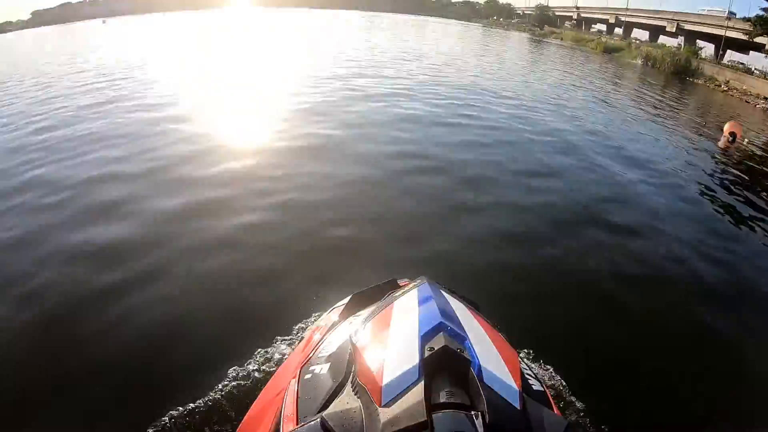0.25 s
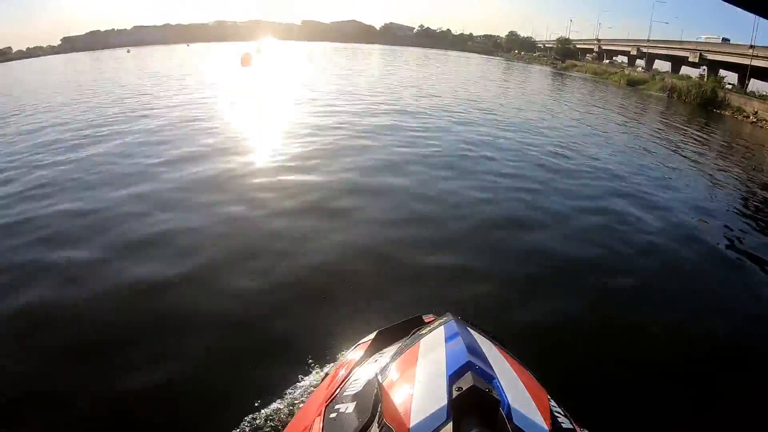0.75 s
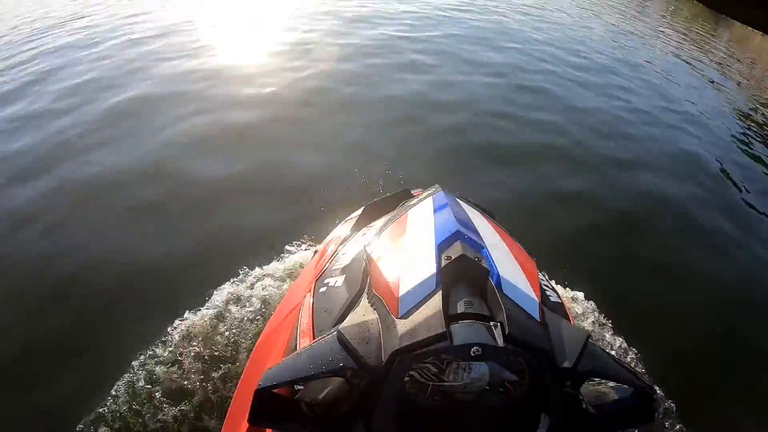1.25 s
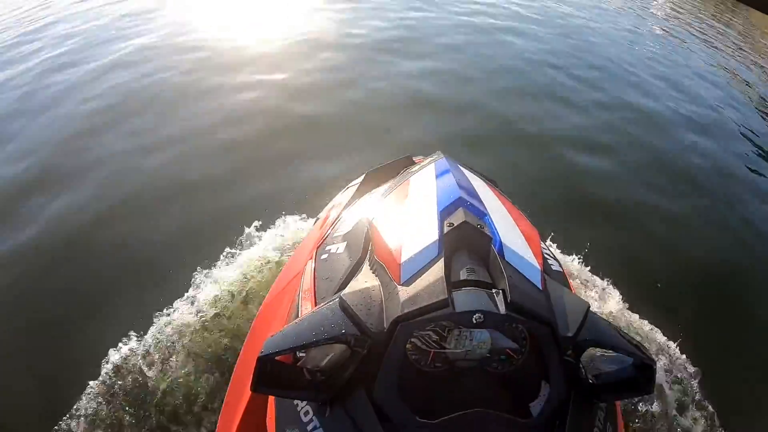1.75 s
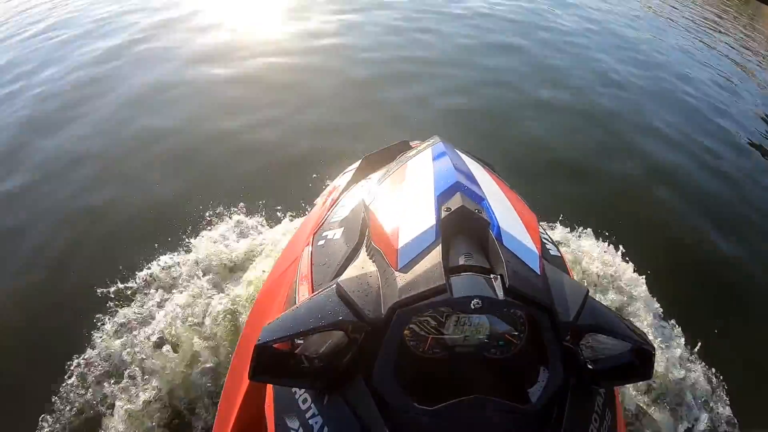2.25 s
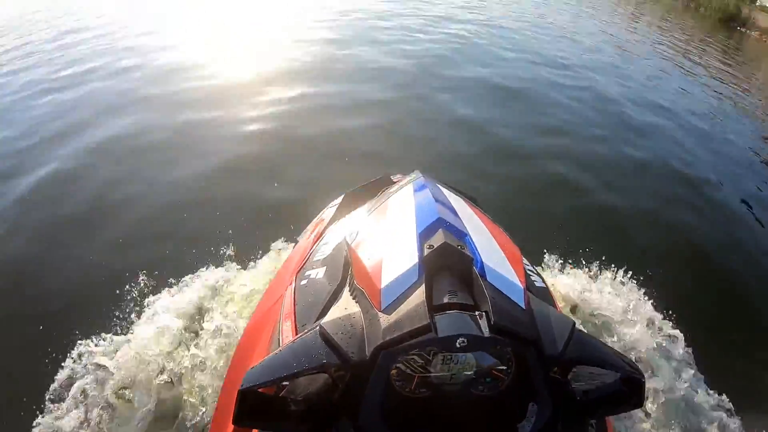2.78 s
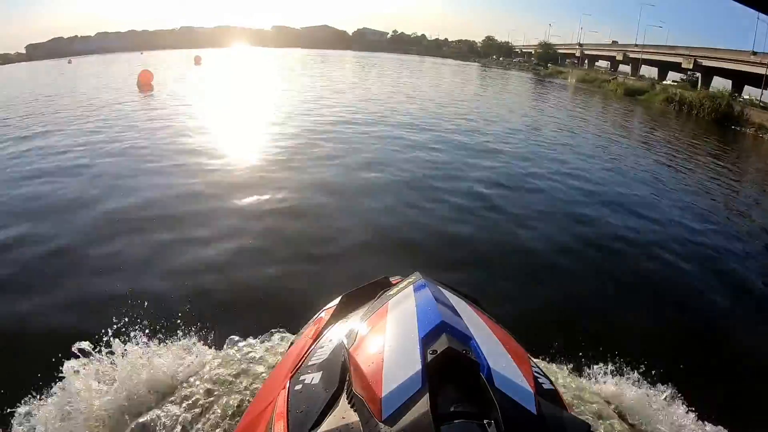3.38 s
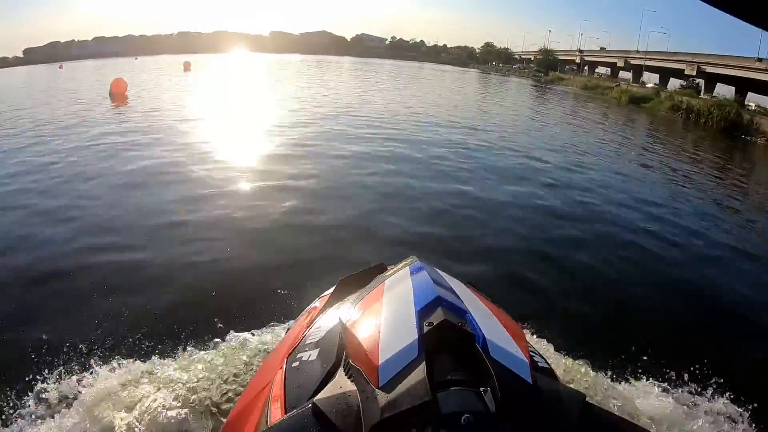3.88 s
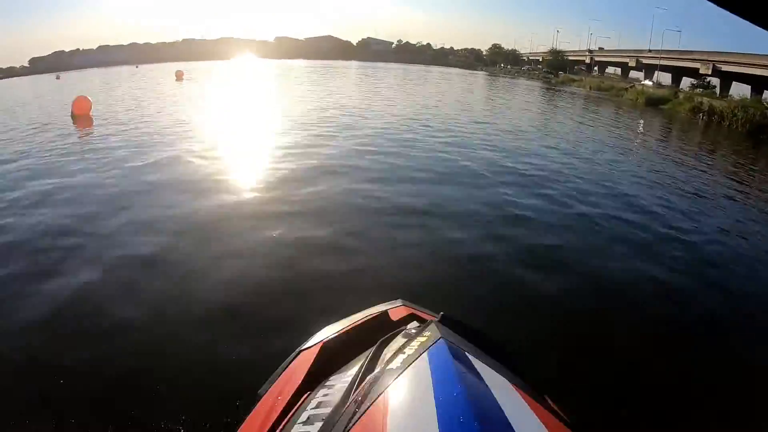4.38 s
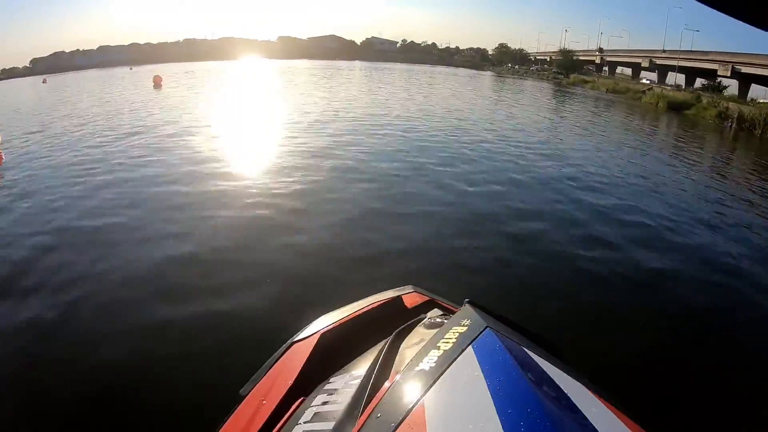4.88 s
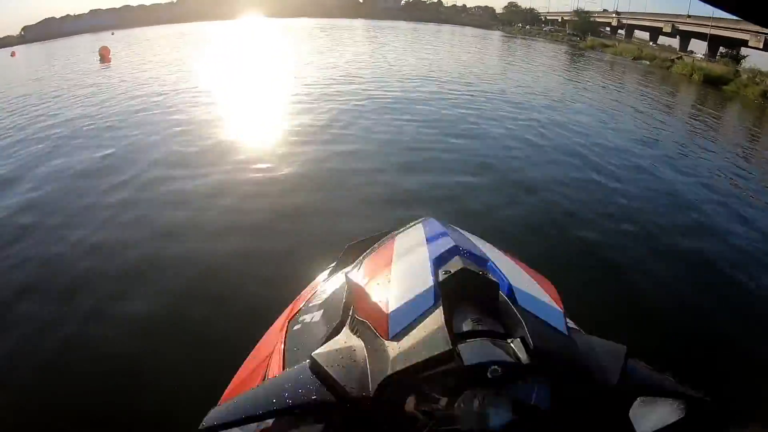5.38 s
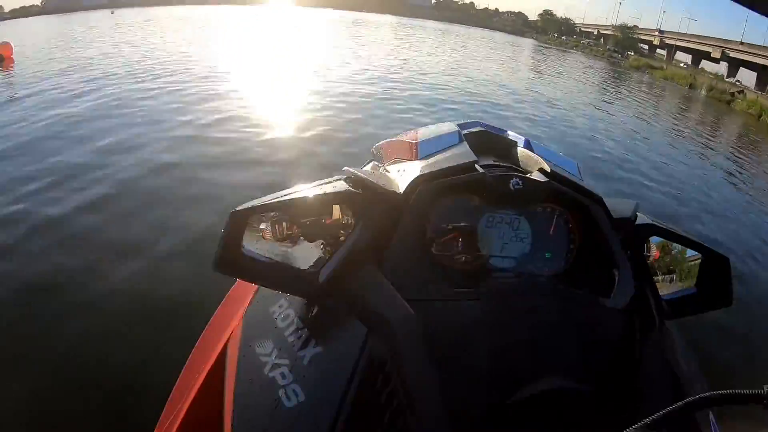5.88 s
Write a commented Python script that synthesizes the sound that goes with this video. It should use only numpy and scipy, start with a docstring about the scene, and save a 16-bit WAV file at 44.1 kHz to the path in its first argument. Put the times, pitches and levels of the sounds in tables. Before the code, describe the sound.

Rider's view of a jet-driven watercraft, heard by a housed microphone on the rider in the open, without echo. A slow, buzzy engine burble over gurgling wash comes first, with splashing gradually swelling. Then a fast rev-up turns the burble into a loud steady roar; bow spray thins out while rushing water and buffeting low wind grow, and a dull knock lands near the end.

```python
"""A three-cylinder jet-drive watercraft pushes slowly across a lake: a housed microphone on the rider
hears firing harmonics through the hull (sines locked to the engine cycle), churned water (shaped noise),
faint ticks and a thin blower whistle. Bow spray (noise and drop impacts) then grows. Past four seconds
the throttle opens and the craft climbs onto the plane: the engine tones leap up, a water sheet hisses,
low noise of wind thumps on the housing, and a louder knock comes near the end."""
import sys
import numpy as np
from scipy import signal
from scipy.fft import rfft, irfft, next_fast_len
from scipy.io import wavfile
from scipy.ndimage import uniform_filter1d, minimum_filter1d

SR = 44100
rng = np.random.default_rng(int(sys.argv[2]) if len(sys.argv) > 2 else 0)


def linear_from_db(decibels):
    """Turn decibels (scalar or array-like) into linear amplitude factors; 0 gives 1."""
    return 10 ** (np.asarray(decibels, float) / 20)


def wav_record(signal):
    """Record a signal, one row per channel, as 16-bit PCM in the file named by sys.argv[1]."""
    frames = np.transpose(np.atleast_2d(signal))
    bounded = np.clip(frames, -1, 1)
    # unit amplitude maps onto the largest positive 16-bit level
    quanta = np.round(bounded * 32767).astype(np.int16)
    wavfile.write(sys.argv[1], SR, quanta)


N = 270774
FULL_PER_S = 70  # engine cycles per s at full throttle


def rms_one(x):
    """Scale to rms 1."""
    return x / np.sqrt(np.mean(x ** 2) + 1e-20)


def in_time(rows):
    """Interpolate every column of a table to one value per sample."""
    s, *columns = np.transpose(rows)
    return [np.interp(np.arange(N) / SR, s, column) for column in columns]


def drift(rate_hz):
    """Slow chance of rms 1: noise through a double one-pole low-pass, at one value per 40 samples."""
    pole = np.exp(-2 * np.pi * rate_hz * 40 / SR)
    noise = rng.standard_normal(N // 40 + 2002)
    slow = signal.lfilter([1], [1, -2 * pole, pole * pole], noise)[2000:]
    return np.interp(np.arange(N) / 40, np.arange(len(slow)), rms_one(slow))


def bump(at_s, length_s):
    """A smooth rise and fall to 1 and back, above half height for the given length."""
    return 2.0 ** -(2 * (np.arange(N) / SR - at_s) / length_s) ** 2


def coloured(source, spectrum):
    """Shape a source by a spectrum, interpolated over log frequency; rms 1."""
    hz, db = np.transpose(spectrum)
    size = next_fast_len(N)
    bins_hz = np.maximum(np.arange(size // 2 + 1) * SR / size, 1)
    gain = linear_from_db(np.interp(np.log(bins_hz), np.log(hz), db))
    return rms_one(irfft(rfft(source, size) * gain, size)[:N])


def grains(per_s, spread_db):
    """Droplet impacts at random moments, their sizes spread exponentially in dB; rms 1."""
    sizes = linear_from_db(spread_db * np.minimum(rng.exponential(1, N), 5))
    signs = rng.choice([-1, 1], N)
    return rms_one(sizes * signs * (rng.random(N) < per_s / SR))


def tone_db(multiple, per_s):
    """Hull and exhaust favour some pitches: weigh one multiple of the cycle as it glides, with its swells."""
    # Each row: frequency in Hz, level in dB.
    hull = [(20, -44), (55, -33), (72, -23), (82, -20.5), (100, -15), (130, -14.5), (150, -16), (175, -16),
            (210, -19.5), (228, -22.5), (245, -18), (262, -6.5), (290, -14.5), (315, -15.5), (345, -15),
            (420, -15.5), (640, -23), (900, -16.5), (1700, -22)]
    # Single tones swell or fade. Each row: centre in s, length in s, multiple of the cycle, change in dB.
    swells = [(.03, 0.1, 3, -10), (0.16, .1, 3, 8.5), (0.911, 0.6, 3, -4), (4.26, 0.065, 3, -4.5),
              (4.404, 0.095, 3, 6), (4.509, .04, 3, -16), (4.57, 0.13, 3, 7), (4.977, 0.2, 3, -21),
              (5.22, 0.087, 3, 7.5), (5.414, 0.12, 3, 5.5), (5.66, 0.21, 3, -8.5), (5.81, 0.092, 3, 4),
              (6.113, 0.081, 3, -19.5), (0.17, 0.11, 6, -8), (1.163, 0.15, 6, 7.5), (1.85, 0.14, 6, -9.5),
              (2.6, 0.75, 6, -4.5), (3.49, 0.36, 6, -17), (4.113, .06, 6, -8), (4.69, 0.11, 6, 8.5),
              (5.17, 0.14, 6, 5.5), (4.298, 0.033, 6, 6), (.55, .08, 6, 1.5), (0.76, 0.057, 6, -6),
              (5.418, .1, 6, -15.5), (5.893, 0.22, 6, 2), (0.38, 0.24, 9, 6), (0.99, 0.62, 9, -18.5),
              (2.67, 0.12, 9, -6), (.8, .7, 11, -8), (0.22, 0.11, 21, 8.5), (.22, .1, 24, 11),
              (5.2, .6, 14, -6), (3.723, 0.22, 9, 4), (4.075, 0.08, 9, 4.5), (4.156, 0.086, 9, -5),
              (5.04, 0.17, 9, 6), (5.4, .15, 9, -4), (1.193, .15, 12, -8), (1.79, 0.15, 12, -9),
              (2.847, 0.41, 12, 5.5), (4.342, 0.09, 12, 12.5), (4.675, 0.13, 12, -13.5), (5.0, .1, 12, 6.5),
              (5.87, 0.2, 12, -7), (6.2, .35, 12, 4.5), (5.75, 0.7, 11, -11), (0.503, 0.55, 4, 11),
              (1.598, 0.87, 4, 6), (1.605, 0.68, 5, 4), (0.03, 0.1, 12, -14), (.27, 0.077, 12, 13.5),
              (.15, 0.091, 12, -8), (.45, 0.23, 12, 4.5), (4.31, .1, 13, 10), (.11, .09, 15, 14),
              (.17, 0.034, 15, -14), (0.2, .05, 15, 7), (0.25, .05, 15, -10), (4.45, 0.27, 4, 9.5),
              (5.8, .45, 4, 7), (1.2, .6, 5, -8), (3.4, .8, 5, -6), (3.8, .5, 7, 7.5), (5.8, .6, 8, 6.5),
              (2.2, 1.0, 11, 7.5), (2.9, 0.78, 16, 4), (2.1, .8, 15, 4.5), (5.44, 0.092, 18, 6),
              (5.95, 0.54, 18, -8), (5.9, .5, 16, -6), (3.3, 0.8, 24, 10.5), (0.57, 1.0, 15, 12),
              (1.548, .5, 24, 16)]
    hz, db = np.transpose(hull)
    swell_db = sum(change_db * bump(s, length_s) for s, length_s, k, change_db in swells
                   if round(k) == multiple)
    return np.interp(np.log(multiple * per_s), np.log(hz), db) + swell_db


def engine(turns, per_s):
    """Sines locked to the cycle add up to exhaust pulses; combustion varies, so each wavers, more at speed."""
    # Firing tone (3rd multiple of the cycle) and its harmonics: level in dB before hull colour.
    firing = (-0.5, -8, -11.5, -19)
    # Cylinders differ, so other multiples sound too. Each row: multiple of the cycle,
    # level in dB before hull colour when slow, the same at full throttle.
    uneven = [(1, -12, -11.5), (2, -0.5, -11), (4, -18, -26), (5, -17, -27.5), (7, -28, -17), (8, -19, -17),
              (10, -27.5, -18), (11, -28.5, -13), (13, -32, -25.5), (14, -35.5, -25.5), (15, -27, -26.5),
              (16, -27.5, -21.5), (17, -29.5, -24), (18, -27.5, -20.5), (20, -25.5, -34.5),
              (21, -27.5, -40), (24, -31.5, -27)]
    out = np.zeros(N)
    strain = per_s / FULL_PER_S
    for k, level_db in enumerate(firing, 1):
        phase = 3 * k * turns + 0.18 * drift(9) + 0.12 * k * strain ** 2 * drift(25)
        level_db = level_db + tone_db(3 * k, per_s) + 1.2 * drift(14)
        out += linear_from_db(level_db) * np.sin(phase)
    opened = np.clip(2 * strain - 1, 0, 1)
    for multiple, slow_db, full_db in uneven:
        k = round(multiple)
        level_db = slow_db + opened * (full_db - slow_db) + tone_db(k, per_s)
        level_db += 1.8 * drift(5) + 1.4 * strain * drift(20)
        waver = 0.07 + (0.12 + 0.022 * multiple) * strain ** 2
        phase = k * turns + rng.uniform(0, 2 * np.pi) + 0.8 * drift(1.5) + waver * drift(20)
        out += linear_from_db(level_db) * np.sin(phase)
    return np.sqrt(2) * out


def wind(wash_db):
    """Eddies shed at the housing: low noise that grows with the wash; the strongest lumps saturate."""
    # Gusts and lulls. Each row: centre in s, length in s, change in dB.
    gusts = [(0.023, 0.56, 12), (2.0, 0.49, 4), (3.494, 0.49, 3), (5.0, 0.37, -6.5), (5.3, 0.23, 1.5),
             (5.65, 0.045, 3), (5.718, 0.046, 15), (5.847, 0.11, 8), (6.066, 0.11, 3)]
    # Eddy spectrum. Each row: frequency in Hz, relative level in dB per Hz.
    eddy_spectrum = [(15, -24.5), (30, -7), (60, 23.5), (120, 15), (200, 11.5), (280, 4), (350, -4),
                     (600, -29), (2000, -100)]
    level_db = -44.5 + 1.69 * wash_db
    level_db += sum(db * bump(s, length_s) for s, length_s, db in gusts)
    eddies = coloured(rng.standard_normal(N), eddy_spectrum)
    strength = uniform_filter1d(uniform_filter1d(eddies ** 2, size=900), size=900)
    return linear_from_db(level_db) * rms_one(eddies / (strength + 0.3) ** 0.3)


def churn(level_db, turns):
    """Exhaust and jet beat through the water: low noise that each firing and each cycle pushes a little."""
    # Each row: frequency in Hz, relative level in dB per Hz.
    churn_spectrum = [(60, -7.5), (120, 2), (250, -3), (400, -7.5), (600, -8.5), (800, -15), (1150, -17.5),
                      (1600, -23.5), (2000, -27), (2250, -37.5), (6000, -100)]
    throb = 1 + 0.11 * np.cos(3 * turns) + 0.11 * np.cos(turns)
    noise = coloured(rng.standard_normal(N) * throb, churn_spectrum)
    return linear_from_db(level_db + 0.35 * drift(4.9)) * noise


def rush(level_db, per_s):
    """Water breaks along the hull: noise and drop impacts, louder and deeper once the craft planes."""
    # Spectra when slow and on the plane. Each row: frequency in Hz, relative level in dB per Hz.
    slow_spectrum = [(900, -12), (2000, 5), (3000, 1.5), (4800, -2.5), (6300, -13), (7500, -22.5),
                     (8500, -24.5), (9800, -42), (12000, -69.5)]
    planing_spectrum = [(600, -5.5), (1300, -3.5), (2000, -2.5), (2600, -4.5), (3500, -10), (5100, -17.5),
                        (6500, -28.5), (8500, -38.5), (9800, -52.5), (12000, -90)]
    source = rng.standard_normal(N) + 0.4 * grains(1500, spread_db=4.0)
    planing = np.clip((per_s - 35) / 30, 0, 1)
    wash = (1 - planing) * coloured(source, slow_spectrum)
    wash += planing * linear_from_db(7.5) * coloured(source, planing_spectrum)
    return linear_from_db(level_db + 0.65 * drift(23)) * wash


def spray(level_db):
    """The bow wave falls back as drops, in clumps: noise plus impacts at a drifting rate."""
    # Each row: frequency in Hz, relative level in dB per Hz.
    spray_spectrum = [(3000, -2.5), (5000, 8), (6500, 1.5), (8000, 1), (9500, -5), (11200, -17),
                      (12200, -1), (13500, -3.5), (15500, -11)]
    drops = grains(2500 * linear_from_db(4.1 * drift(25)), spread_db=0.0)
    source = rng.standard_normal(N) + drops
    return linear_from_db(level_db + 1.3 * drift(6)) * coloured(source, spray_spectrum)


def ticks():
    """Something small ticks against the hull: band-passed bursts of noise that die exponentially."""
    # Each row: start in s, level in dB before the band-pass, 60 dB decay time in s, lowest frequency in Hz.
    tick_rows = [(.174, -45, .05, 2200), (.38, -52, .03, 5000), (6.075, -21, .08, 350)]
    out = np.zeros(N)
    white = rng.standard_normal(N)
    for s, db, t60_s, low_hz in tick_rows:
        after_s = np.arange(N) / SR - s
        burst = (after_s > 0) * linear_from_db(db - 60 * np.abs(after_s) / t60_s) * white
        band_hz = [low_hz, min(3 * low_hz, 6800)]
        sos = signal.butter(4, band_hz, "band", fs=SR, output="sos")
        out += signal.sosfilt(sos, burst + 1e-18)
    return out


def whistle(hz, level_db, unsteady_hz):
    """A thin tone, unsteady in pitch and level."""
    phase = 2 * np.pi * np.cumsum(hz + unsteady_hz * drift(150)) / SR
    return np.sqrt(2) * linear_from_db(level_db + 1.5 * drift(15)) * np.sin(phase)


def blower(turns, per_s):
    """Early a whistle and a fading lower one, fluttering with the firing; under throttle one geared tone."""
    # Early whistle. Each row: time in s, pitch in Hz, level in dB.
    slow_whistle = [(.19, 4500, -76), (.225, 4680, -63), (.4, 4760, -64), (.5, 4900, -62.5),
                    (1.08, 4950, -64.5), (1.16, 5230, -70), (1.47, 5520, -76)]
    # The geared tone drops out at times. Each row: centre in s, length in s, change in dB.
    fast_fades = [(5.04, .07, -12), (5.3, .3, -7), (5.63, .06, -10), (6.0, .25, -10)]
    s = np.arange(N) / SR
    hz, level_db = in_time(slow_whistle)
    on = (s > slow_whistle[0][0]) & (s < slow_whistle[-1][0])
    lower_db = level_db - 1 - 6 * s  # fades 6 dB per s against the upper one
    pair = whistle(hz, level_db, unsteady_hz=46) + whistle(0.96 * hz, lower_db, unsteady_hz=46)
    pair = pair * (1 + 0.45 * np.cos(3 * turns + drift(6)))
    # loses 0.7 dB for each cycle per s below 72
    fast_db = -70.5 - 0.7 * np.maximum(72 - per_s, 0)
    fast_db += sum(db * bump(at_s, length_s) for at_s, length_s, db in fast_fades) + 2.5 * drift(8)
    return on * pair + whistle(92.6 * per_s, fast_db, unsteady_hz=20)


def sheet():
    """A thin sheet of water hisses away from the planing hull: bright shaped noise."""
    # Each row: time in s, level in dB.
    sheet_levels = [(0, -80), (4.6, -80), (5.0, -62), (5.3, -56.5), (5.45, -51), (5.7, -53), (5.85, -51),
                    (6.14, -55)]
    # Each row: frequency in Hz, relative level in dB per Hz.
    sheet_spectrum = [(2000, -30), (3200, -6), (4500, 0), (5500, -1), (6300, -7.5), (6900, -28),
                      (9000, -60)]
    level_db, = in_time(sheet_levels)
    return linear_from_db(level_db + 1.0 * drift(12)) * coloured(rng.standard_normal(N), sheet_spectrum)


def scene():
    """Engine speed, wash and bow wave drive the sources, which all reach one microphone on open water."""
    # Engine speed. Each row: time in s, four-stroke cycles per s.
    revs = [(0, 21), (.055, 22), (.065, 15.8), (.15, 17), (.21, 18.7), (.27, 19.7), (.38, 20.3), (.6, 20.9),
            (1.05, 21.2), (1.39, 24), (1.49, 24.4), (1.64, 24.4), (1.88, 25.4), (2.0, 26.3), (2.15, 26.3),
            (2.4, 27.4), (2.96, 29), (3.12, 28.8), (3.59, 29), (3.75, 29.7), (4.075, 29.8), (4.37, 58.9),
            (4.55, 70.3), (4.62, 72.7), (4.72, 72.8), (4.88, 72.1), (5.07, 71.2), (5.24, 70.2),
            (5.48, 68.4), (5.8, 68.3), (6.14, 69)]
    # Force of the water along the hull. Each row: time in s, level in dB re slow cruise.
    wash_levels = [(0, -0.5), (1.85, 0), (2.0, 5), (4.25, 3.5), (4.45, 6), (4.75, 2.5), (4.9, 8),
                   (5.25, 7.5), (5.4, 10.5), (5.83, 12.5), (6.14, 13.5)]
    # Size of the bow wave, as the level of its spray. Each row: time in s, level in dB.
    bow_wave = [(0, -76.5), (.7, -76.5), (1.0, -72), (1.6, -65.5), (2.0, -64), (2.5, -60), (3.7, -57.5),
                (4.0, -61), (4.4, -58), (4.65, -66), (4.9, -62.5), (5.15, -59.5), (5.3, -64), (5.45, -72),
                (5.53, -66), (5.65, -82.5), (5.86, -95), (5.97, -69), (6.14, -72.5)]
    # The hull meets a wavelet or a trough. Each row: centre in s, length in s, rush change in dB,
    # churn change in dB.
    surges = [(0.218, 0.33, 2.5, 2), (0.996, 0.24, 2, -0.5), (4.38, 0.19, -2.5, 2), (4.7, 0.17, 2, -2),
              (5.25, .1, 1, -1.5), (5.571, 0.18, 5.5, 2.5), (5.82, 0.15, -3.5, -2.5), (6.03, .2, 0.5, 1.5)]
    per_s, = in_time(revs)
    wash_db, = in_time(wash_levels)
    spray_db, = in_time(bow_wave)
    turns = 2 * np.pi * np.cumsum(per_s) / SR  # phase of the cycle in radians
    rush_surge_db, churn_surge_db = sum(np.outer(db, bump(s, length_s)) for s, length_s, *db in surges)
    revs_db = 20 * np.log10(per_s / FULL_PER_S)
    churn_db = -20.5 + 0.21 * wash_db + 0.91 * revs_db + churn_surge_db
    rush_db = -54 + wash_db + rush_surge_db
    water = churn(churn_db, turns) + rush(rush_db, per_s) + spray(spray_db) + sheet()
    mix = engine(turns, per_s) + wind(wash_db) + water + ticks() + blower(turns, per_s)
    return mix[None, :]


def low_pass(x):
    """Removes everything above the highest recorded frequency."""
    return signal.sosfilt(signal.butter(12, 15620, fs=SR, output="sos"), x)


def record(dry):
    """A look-ahead limiter holds the peaks at 0.65, after a 6 ms fade-in."""
    room = np.minimum(0.65 / (np.abs(dry) + 1e-9), 1)
    gain = uniform_filter1d(minimum_filter1d(room, size=441), size=441)  # 10 ms windows
    fade = np.minimum(np.arange(N) / (0.006 * SR), 1)
    return low_pass(fade * gain * dry)


dry = scene()
out = record(dry)
wav_record(out)
```